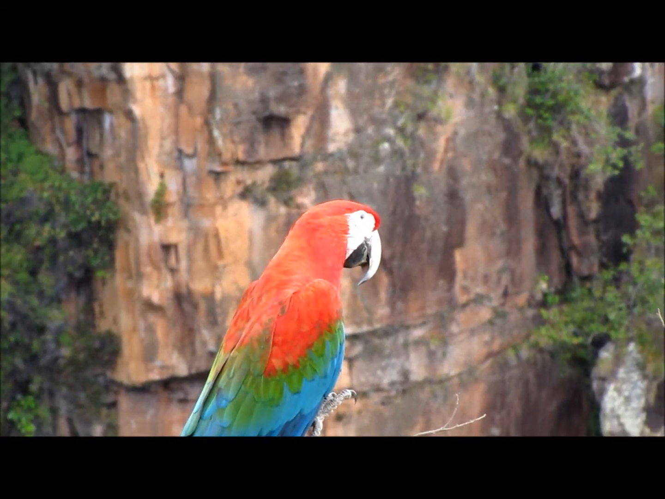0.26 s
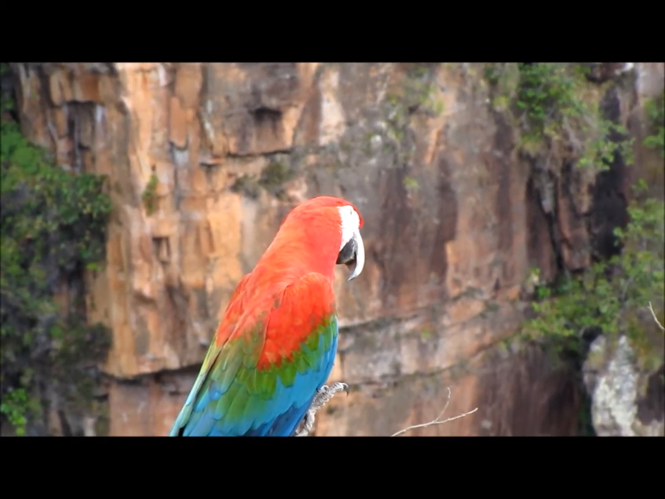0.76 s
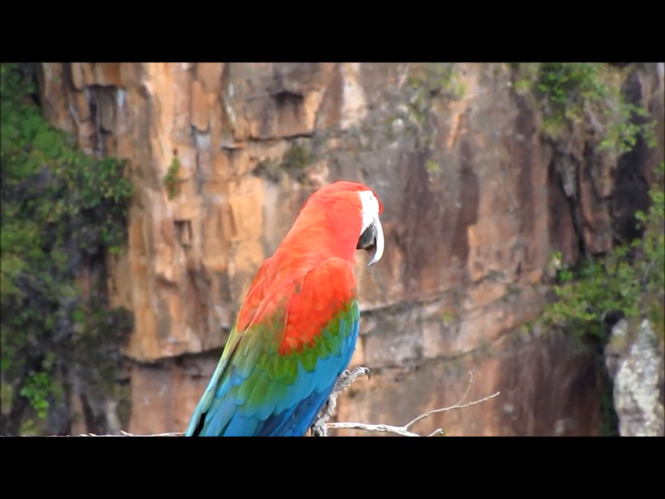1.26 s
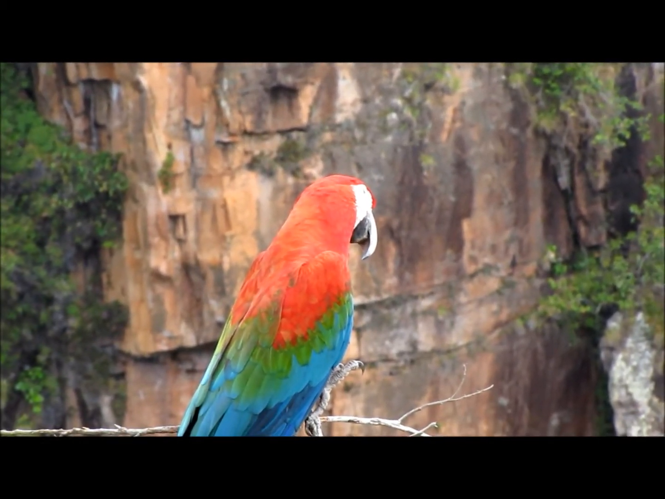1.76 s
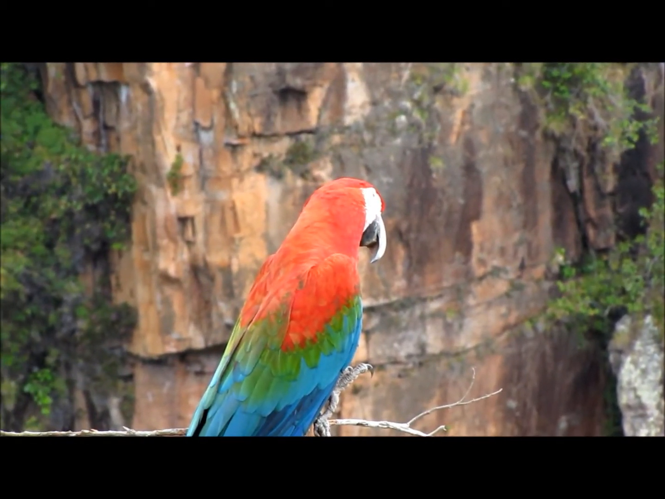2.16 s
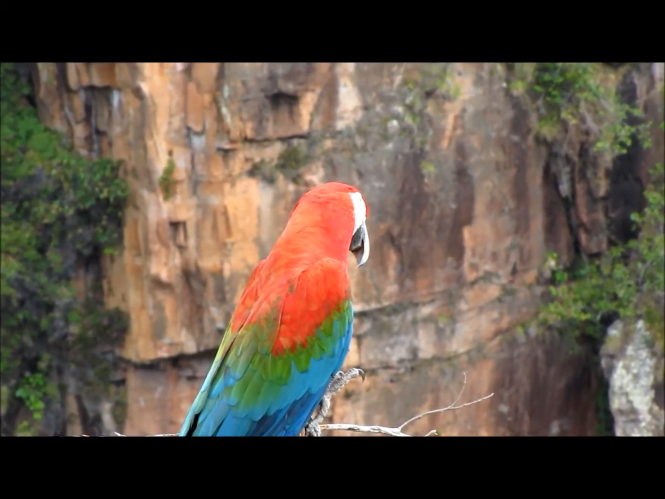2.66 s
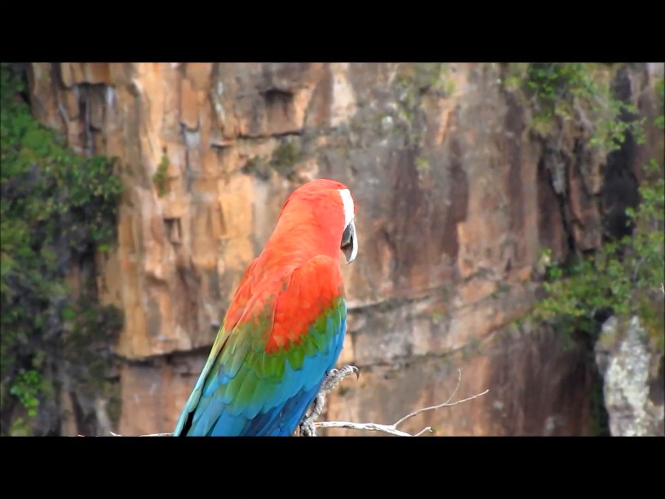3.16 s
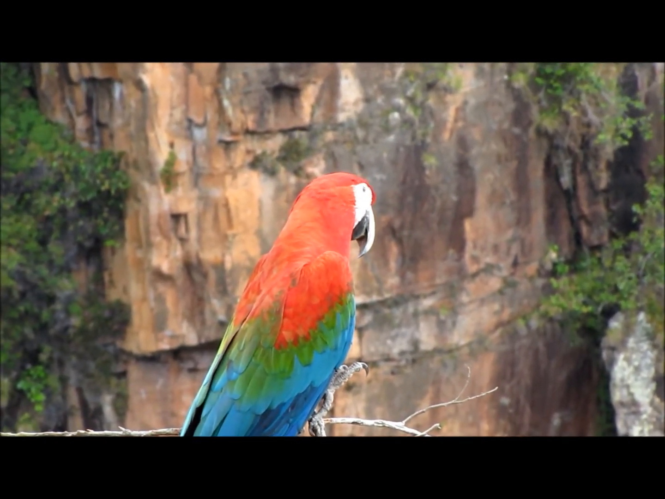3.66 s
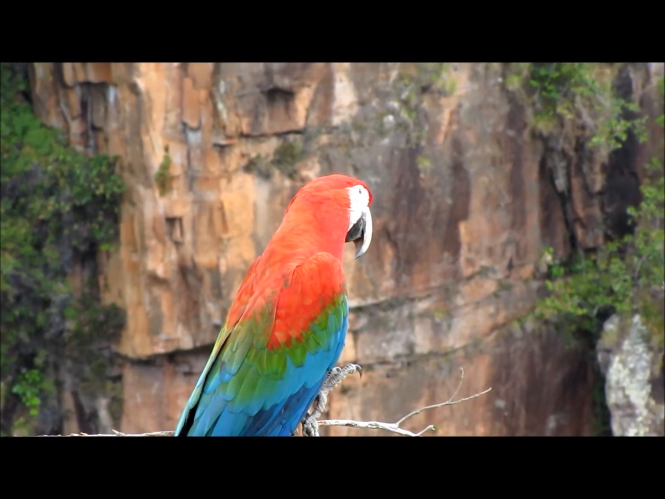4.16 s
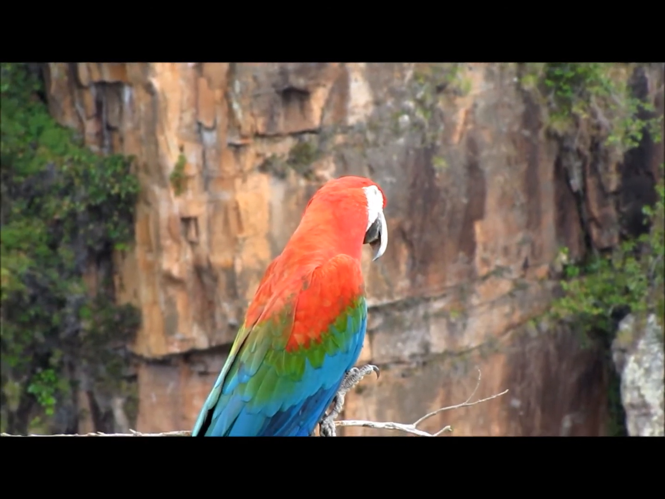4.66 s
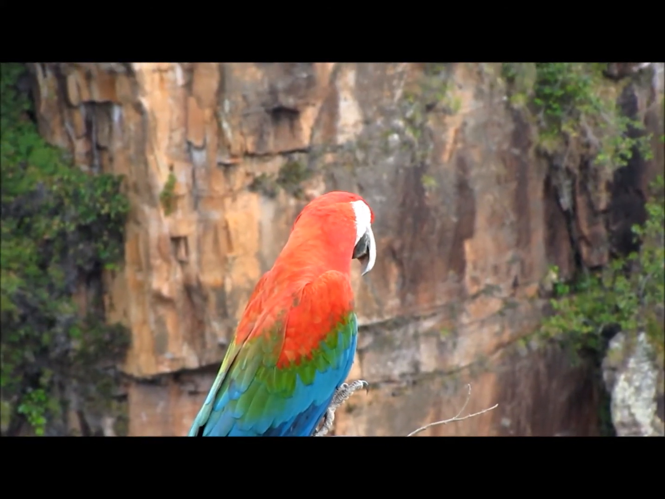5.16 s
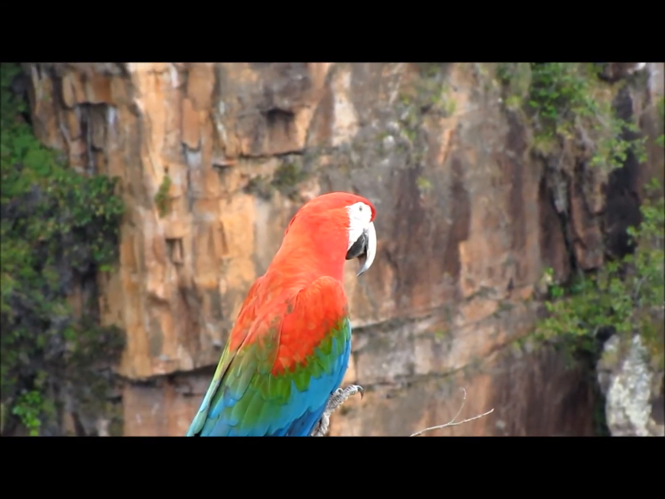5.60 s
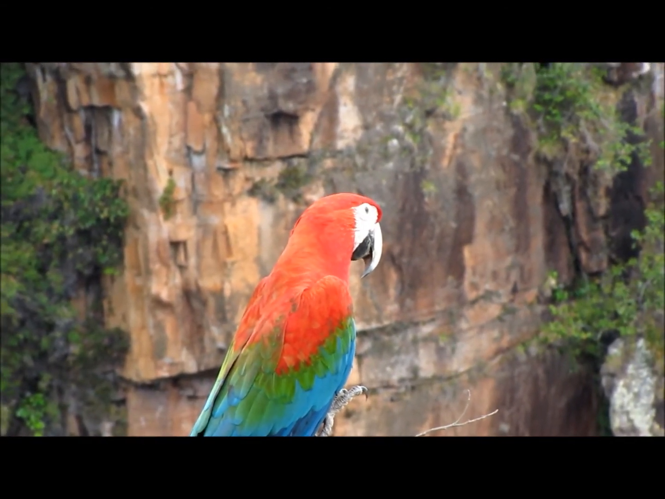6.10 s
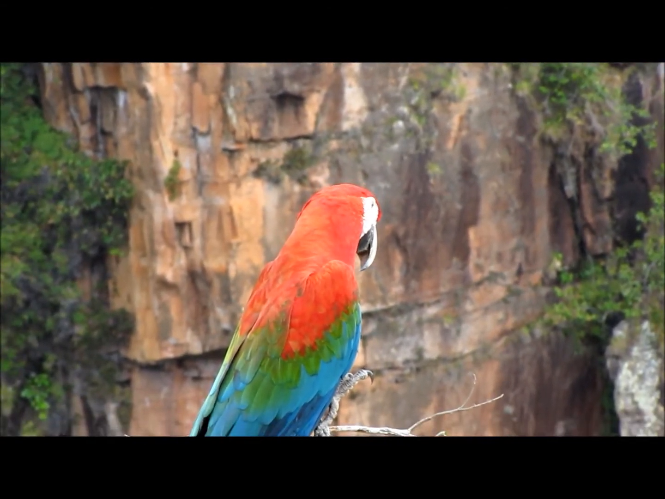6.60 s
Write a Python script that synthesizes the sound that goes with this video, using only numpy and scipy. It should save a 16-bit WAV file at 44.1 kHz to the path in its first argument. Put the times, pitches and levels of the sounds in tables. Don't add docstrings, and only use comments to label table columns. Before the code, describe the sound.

A small camera's stereo microphone by a cliff picks up the smooth hiss of far falling water and low wind rumble, strongest early. Sharp plastic clicks from handling open the scene. A large parrot then lets out a loud, raspy squawk with cracking pitch, and after a calmer pause gives a second, harsher one with a breathy whistle. Short echoes scatter off the rock. A wind gust swells near the end.

```python
import sys
import numpy as np
from scipy import signal
from scipy.fft import rfft, irfft, next_fast_len
from scipy.io import wavfile
from scipy.ndimage import uniform_filter1d, map_coordinates

SR = 44100
rng = np.random.default_rng(int(sys.argv[2]) if len(sys.argv) > 2 else 0)


def transcribe(signal):
    frames = np.atleast_2d(signal).T
    limited = np.clip(frames, -1, 1)
    pcm = np.round(limited * 32767).astype(np.int16)
    wavfile.write(sys.argv[1], SR, pcm)


def to_linear_factor(level_db):
    exponent = np.asarray(level_db, float) / 20
    return 10 ** exponent


N = 301644

TOP, HIGH, LOW = 4 / 3, 1, 2 / 3


def unit(x):
    return x / np.sqrt(np.mean(x ** 2, axis=-1, keepdims=True) + 1e-20)


def along(points, hz, column=1):
    rows = np.transpose(points)
    return np.interp(np.log(hz + 1), np.log(rows[0] + 1), rows[int(column)])


def curves(rows):
    s, *cols = np.transpose(rows)
    return [np.interp(np.arange(N) / SR, s, c) for c in cols]


def wobble(rate):
    return map_coordinates(rng.standard_normal(int(N * rate / SR) + 4), [np.arange(N) * rate / SR])


def filtered(x, response):
    m = 2 * next_fast_len(N // 2 + 4096)
    return irfft(rfft(x, m) * response(np.fft.rfftfreq(m, 1 / SR)), m)[..., :N]


def resonances(modes):
    def response(f):
        total = 0
        for k, (center, width, db) in enumerate(modes):
            damping = 1j * f * width
            total = total + (-1) ** k * to_linear_factor(db) * damping / (center * center - f * f + damping)
        return total
    return response


def causal(points):
    def response(f):
        cepstrum = irfft(np.log(to_linear_factor(along(points, f)) + 1e-6))
        cepstrum[1:len(f) - 1] *= 2
        cepstrum[len(f):] = 0
        return np.exp(rfft(cepstrum))
    return response


def sided(db):
    return to_linear_factor(np.array([db / 2, -db / 2]))


def port_lead(radians):
    return np.exp(1j * radians / 2 * np.array([[1], [-1]]))


def gusts():
    # time_s, buffet_db
    slow_flow = [(0, -26), (.5, -28), (.8, -28), (.9, -33), (1.2, -29), (1.55, -27), (1.85, -36),
                 (2.2, -34.5), (2.6, -41.5), (3.6, -43), (4.4, -44), (5.0, -40.5), (5.7, -39), (6.1, -40),
                 (6.45, -35), (6.84, -30)]
    # peak_s, lift_db, half_length_s, left_right_db, bite_db
    single_gusts = [(.11, 4, .06, 0, 9), (.31, 1, .03, -4, 8), (.472, 4, .04, 6, 0), (.74, 2, .05, 0, 0),
                    (1.04, 8, .1, 2, 6), (1.36, -1, .08, 12, -3), (1.47, 5, .07, 0, -5),
                    (1.735, 8, .04, 20, 15), (3.21, 5, .06, 8, 0), (3.78, 4, .07, -5, 0),
                    (4.59, 7, .06, -5, -5), (4.87, 4, .06, -6, -4), (5.18, 5, .04, -3, 0),
                    (5.53, 3, .05, -5, -4), (6.232, 15, .06, 0, 0), (6.394, 4, .03, -6, 0),
                    (6.55, 5, .06, 9, 0), (6.78, 1, .05, 0, 5)]
    calm_db, veer = -46, -.72
    t, added = np.arange(N) / SR, np.zeros((3, N))
    for s, lift_db, half_s, pan_db, bite_db in single_gusts:
        swell = np.interp(t, [s - abs(half_s), s, s + abs(half_s)], [0, 1, 0])
        added += np.outer([lift_db, pan_db, bite_db], swell)
    level_db = curves(slow_flow)[0] + added[0]
    return level_db, added[1] + veer * (level_db - calm_db), added[2]


def wind(strength_db, side_db, bite_db):
    # pitch_hz, level_db per Hz
    buffet = [(8.8, -37), (15, 1.5), (77, 2.5), (374, -29), (405, -25.5), (476, -48), (568, -29),
              (700, -38), (910, -72), (1540, -120)]
    flutter_db, sway_db = 1, 2
    smooth = uniform_filter1d([strength_db, side_db], size=400)
    level_db, pan_db = smooth + [flutter_db * wobble(9), sway_db * wobble(6)]
    lumps_db = np.array([1.9 * wobble(14) + 1.5 * wobble(35) for port in range(2)])
    body = unit(filtered(rng.standard_normal((2, N)), lambda f: to_linear_factor(along(buffet, f))))
    edge_band = lambda f: f * f / (f * f + 100.0 ** 2) / (1 + (f / 220) ** 3)
    edge = unit(filtered(rng.standard_normal((2, N)), edge_band))
    eddies = unit(body * to_linear_factor(lumps_db))
    sharp = to_linear_factor(bite_db - 19) * unit(edge * to_linear_factor(1.2 * lumps_db))
    power = uniform_filter1d(uniform_filter1d(eddies ** 2, size=4000), size=4000)
    held = np.sqrt(np.abs(power) + .05)
    return to_linear_factor(level_db + 1.5) * sided(pan_db) * (eddies / held + sharp)


def water(wind_db):
    # pitch_hz, level_db per Hz
    hiss = [(59, -37), (100, -5), (214, -2), (290, -3), (477, 0.5), (697, -3.5), (843, -1), (1340, -4.5),
            (2000, -8.5), (2690, -14), (3600, -13), (4660, -15), (5510, -19), (6950, -30), (8500, -33),
            (11500, -42.5), (15500, -47.5)]
    # pitch_hz, likeness (0-1)
    likeness = [(100, 1), (700, 0.99), (1400, 0.88), (3000, .6), (5000, 0.3), (8000, 0.61), (15000, .15)]
    # pitch_hz, left_right_db
    lean = [(100, -0.5), (700, 1.5), (1300, -1), (2400, -2.5), (4400, 4), (8000, -1), (15000, 1)]
    # pitch_hz, left_lead_radians
    lead = [(100, -0.5), (1000, 0.58), (2000, 0.93), (2400, 3), (3600, 4), (5800, 7), (8300, 12),
            (15000, 18)]
    # time_s, hiss_db
    drift = [(0, -37.3), (2.1, -38.3), (2.7, -37), (3.5, -38.3), (4.1, -39), (4.9, -37), (6.84, -37.3)]
    duck_from_db, duck_share, recover_s = -36, .24, .4
    z = signal.stft(rng.standard_normal((2, N)), nperseg=512)[2]
    patches = uniform_filter1d(rng.standard_normal(z.shape[1:]), size=8, axis=0)
    patches = uniform_filter1d(patches, size=14, axis=1)
    pair = signal.istft(z * to_linear_factor(0.93 * patches / patches.std()), nperseg=512)[1][:, :N]
    alike = lambda f: np.clip(along(likeness, f), 0, .95)
    turn = lambda f: np.arccos(alike(f)) / 2
    summed = lambda f: np.sqrt(1 + alike(f) * np.cos(along(lead, f)))
    mid, side = filtered(pair, lambda f: to_linear_factor(along(hiss, f)) / summed(f) * [np.cos(turn(f)), np.sin(turn(f))])
    to_ports = lambda f: sided(along(lean, f)) * port_lead(along(lead, f))
    ports = filtered(np.array([mid + side, mid - side]), to_ports)
    excess_db = np.maximum(wind_db - duck_from_db, 0)
    duck_db = duck_share * uniform_filter1d(excess_db, size=int(recover_s * SR))
    level_db = curves(drift)[0] - duck_db + .2 * wobble(1.2) + 0.36 * wobble(3)
    return ports / ports.mean(axis=0).std() * to_linear_factor(level_db)


def hum():
    # pitch_hz, rms_db
    motor = [
        (75.4, -50.5),
    ]
    t, total = np.arange(N) / SR, 0
    for hz, db in motor:
        level = to_linear_factor(db + 2 + 1.1 * wobble(3.8))
        total = total + level * np.sin(2 * np.pi * hz * t + .3 * wobble(3.04))
    return total


def creaks():
    # start_s, peak_db, knock_db, left_right_db
    slips = [(0.071, -31, -2, -3.5), (0.083, -26, -3.5, -8), (0.0994, -33, -1, -6),
             (0.1415, -32.5, -2, -2.0), (0.218, -39, 5, -5), (0.2424, -28.5, 5.5, -8), (0.257, -33, 4, -8),
             (0.283, -31.5, 1, -8), (0.2974, -33, 3, -3), (0.8329, -48, -2, -2.0), (2.804, -51, 3, 0.0),
             (3.3532, -44, 4, 1), (4.292, -38, 13, 0), (6.7759, -38, -4, -5)]
    # peak_s, level_db
    rustle = [
        (.082, -46),
        (.146, -52),
        (.25, -47),
        (.29, -43.5),
    ]
    # pitch_hz, level_db
    snap_tone = [(3000, -42), (6000, -1), (9000, 2), (11500, -6), (13500, -12), (16000, -22)]
    # pitch_hz, width_hz, level_db
    shell = [
        (2340, 380, 0),
        (3250, 590, 2),
    ]
    snap_s = .016
    rise_db_per_s, fall_db_per_s = 600, 550
    snap, knock, t = np.zeros((2, N + SR)), np.zeros((2, N + SR)), np.arange(SR // 10) / SR
    for s, db, knock_db, pan_db in slips:
        grit = rng.standard_normal((2, len(t))) + 1.42 * rng.standard_normal(len(t))
        envelope = to_linear_factor(db - 26 * t / snap_s) * (1 - np.exp(-t / 0.00097))
        burst = sided(pan_db)[:, None] * grit * envelope
        snap[:, round(s * SR):][:, :len(t)] += to_linear_factor(-7) * burst
        knock[:, round(s * SR):][:, :len(t)] += to_linear_factor(knock_db + 3.5) * burst
    peak_s, peak_db = np.transpose(rustle)[:, :, None]
    since = np.arange(N) / SR - peak_s
    rub_db = np.max(peak_db + np.minimum(rise_db_per_s * since, -fall_db_per_s * since), axis=0)
    snap[:, :N] += to_linear_factor(rub_db + 2 + 3 * wobble(150)) * rng.standard_normal((2, N))
    bright = filtered(snap[:, :N], lambda f: to_linear_factor(along(snap_tone, f)))
    return bright + filtered(knock[:, :N], resonances(shell))


def registers():
    # start_s, register (times tension pitch), roughness (0-1)
    breaks = [(1.03, LOW, .9), (1.075, LOW, .7), (1.105, LOW, .5), (1.14, LOW, .4), (1.161, HIGH, .05),
              (1.19, HIGH, .35), (1.25, HIGH, .8), (1.305, HIGH, .07), (1.428, LOW, .45), (1.478, LOW, .38),
              (1.5, LOW, .6), (1.518, HIGH, .2), (1.548, HIGH, .06), (1.603, LOW, .23), (1.656, HIGH, .25),
              (1.675, HIGH, .7), (4.14, HIGH, 1), (4.32, HIGH, .8), (4.38, HIGH, .38), (4.434, HIGH, .05),
              (4.456, HIGH, .13), (4.488, HIGH, .5), (4.505, HIGH, .9), (4.54, HIGH, .6), (4.58, HIGH, .3),
              (4.61, HIGH, .5), (4.635, HIGH, .9), (4.664, TOP, .4), (4.692, HIGH, .6)]
    # time_s, pitch_hz
    tension = [
        [(1.05, 645), (1.11, 615), (1.161, 715), (1.176, 715), (1.19, 665), (1.22, 560)],
        [(1.25, 560), (1.305, 582), (1.33, 622), (1.365, 665), (1.428, 682), (1.452, 645)],
        [(1.48, 665), (1.51, 760), (1.525, 738), (1.546, 732), (1.572, 682), (1.588, 677), (1.603, 692),
         (1.632, 670), (1.654, 712)],
        [(1.675, 640), (1.705, 600)],
        [(4.32, 610), (4.42, 650), (4.44, 716), (4.456, 710), (4.469, 598), (4.505, 535), (4.592, 705),
         (4.635, 630), (4.68, 670)],
    ]
    s, ratio, rough = np.transpose(breaks)
    row = np.clip(np.searchsorted(s, np.arange(N) / SR) - 1, 0, len(s) - 1)
    hz = ratio[row] * curves(sum(tension, []))[0]
    return [uniform_filter1d(v, size=150) for v in (hz, rough[row])]


def membrane(hz, rough, cycles, on):
    hollow_db, hollow_hz = -9, 520
    soft_from_hz, soft_db_per_khz = 4200, -1.6
    order = np.arange(1, 27)[:, None]
    knots = rng.standard_normal((26, len(on) // 600 + 2))
    flex = np.array([np.interp(np.arange(len(on)) / 600, np.arange(len(k)), k) for k in knots])
    even_db = hollow_db * (order % 2 == 0) * np.clip((hollow_hz - hz[on]) / 40, 0, 1)
    fade_db = soft_db_per_khz * np.maximum(order * hz[on] - soft_from_hz, 0) / 1000
    level = to_linear_factor(.9 * np.minimum(order - 1, 6) * flex + even_db + fade_db)
    phase = 2 * np.pi * order * cycles[on] + .12 * order * flex[::-1] + .25 * order ** 2
    snaps = np.zeros(N)
    snaps[on] = np.sum(level * np.cos(phase), axis=0) / 3
    limp = np.clip(2 * rough, 0, .7) * wobble(40) * np.cos(np.pi * cycles)
    return snaps * (1 + limp) * to_linear_factor(np.sqrt(rough) * 3 * wobble(110))


def parrot():
    # time_s, level_db
    effort = [
        [(1.02, -48), (1.1, -24.5), (1.15, -20), (1.184, -15.5), (1.202, -24), (1.216, -52)],
        [(1.252, -45), (1.346, -18), (1.42, -17), (1.452, -24.5), (1.52, -19.5), (1.578, -15.5), (1.61, -19.5),
         (1.64, -18.5), (1.65, -27.5)],
        [(1.664, -15), (1.71, -58)],
        [(4.2, -50), (4.31, -32), (4.36, -24.5), (4.448, -19.5), (4.46, -14), (4.5, -19), (4.666, -18),
         (4.704, -30.5), (4.718, -52)],
    ]
    # pitch_hz, level_db
    narrow_tract = [(300, -50), (620, -16.5), (1000, -9), (1380, 3.5), (1700, -14), (2050, -3.5),
                    (2700, -15), (3300, -17.5), (3900, -20.5), (4600, -22), (5400, -33), (6400, -38),
                    (8000, -43), (13000, -55)]
    # pitch_hz, level_db
    wide_tract = [(300, -34), (520, -15.5), (650, -15), (1000, -6.5), (1360, -6), (1680, -13.5), (2100, -3),
                  (2750, -2.5), (3250, -3.5), (3800, -19), (4500, -19.5), (5400, -33), (7600, -39),
                  (10000, -66)]
    # time_s, opening (0-1)
    opening = [
        [(1.05, .05), (1.12, .2), (1.17, .27), (1.2, .7), (1.27, 0), (1.5, .38), (1.55, .17), (1.63, .3),
         (1.67, .47)],
        [(4.25, .6), (4.36, .75), (4.45, .38), (4.48, .3), (4.51, .83), (4.57, 1), (4.6, .74), (4.65, 1),
         (4.7, .8)],
    ]
    veil = .6
    hz, rough = registers()
    first, second = sum(effort[:3], []), effort[3]
    silences = [(1.0, -120)], [(1.73, -120), (4.15, -120)], [(4.76, -120)]
    level_db, = curves(silences[0] + first + silences[1] + second + silences[2])
    jitter = rough * (.13 * wobble(500) + .08 * wobble(130))
    cycles = np.cumsum(hz * (1 + jitter)) / SR
    snaps = membrane(hz, rough, cycles, np.flatnonzero(level_db > -90))
    rasp = rng.standard_normal(N) * (1 + 0.79 * np.cos(2 * np.pi * cycles))
    air = veil * np.diff(rng.standard_normal(N + 1))
    source = np.sqrt(1 - .7 * rough ** 2) * snaps + .65 * rough * rasp + air
    narrow, wide = (unit(filtered(source, causal(tract))) for tract in (narrow_tract, wide_tract))
    beak = np.clip(curves(sum(opening, []))[0], 0, 1)
    voice = (1 - beak) * narrow + beak * wide
    held = np.sqrt(np.abs(uniform_filter1d(voice ** 2, size=800)) + 1e-12)
    return voice / held * to_linear_factor(uniform_filter1d(level_db, size=100))


def cliff(x):
    # pitch_hz, t60_s
    decay = [(500, 0.24), (3000, 0.17), (10000, 0.073)]
    hz, t, z = signal.stft(rng.standard_normal((2, SR // 4)), SR, nperseg=256)
    tail = signal.istft(z * to_linear_factor(-60 * t / along(decay, hz)[:, None]), SR, nperseg=256)[1]
    return signal.fftconvolve(x[None], tail / np.linalg.norm(tail[0]), axes=1)[:, :N]


def whistle():
    # time_s, level_db, pitch_hz
    phrases = [
        [(4.14, -60, 2980), (4.172, -43, 3000), (4.234, -43, 2940), (4.3, -31.5, 3010), (4.43, -24, 2610)],
        [(4.49, -20, 2850), (4.51, -24, 2750), (4.575, -21, 3280), (4.582, -24, 2700), (4.62, -22, 2720),
         (4.655, -21, 3250), (4.665, -23, 2750), (4.69, -26, 2650), (4.715, -58, 2650)],
    ]
    gap = [(4.44, -91, 2800), (4.48, -91, 2800)]
    path = [(4.12, -120, 2900)] + phrases[0] + gap + phrases[1] + [(4.74, -120, 2800)]
    level_db, hz = curves(path)
    breath = wobble(450) + 1j * wobble(450) + .75
    return to_linear_factor(level_db - 1.5) * np.real(breath * np.exp(2j * np.pi * np.cumsum(hz) / SR))


def scene():
    # pitch_hz, left_right_db, left_lead_radians
    shade = [(700, 0, 0), (1300, 1, -.2), (1700, -1, -.1), (2050, -4.5, .2), (2800, -3.3, .4),
             (3400, -5.5, .8), (3800, .7, .6), (5000, 0, 1.1), (8000, 0, 1.3)]
    bird, flow = parrot() + whistle(), gusts()
    ports = filtered(bird, lambda f: sided(along(shade, f)) * port_lead(along(shade, f, column=2)))
    return ports + to_linear_factor(-17) * cliff(bird) + water(flow[0]) + wind(*flow) + hum() + creaks()


def top_cut(x):
    return signal.sosfilt(signal.butter(12, 15840, fs=SR, output="sos"), x)


def record(dry):
    top_hz = 15780
    mix = filtered(dry, lambda f: f < top_hz)
    return top_cut(mix)


dry = scene()
out = record(dry)
transcribe(out)
```